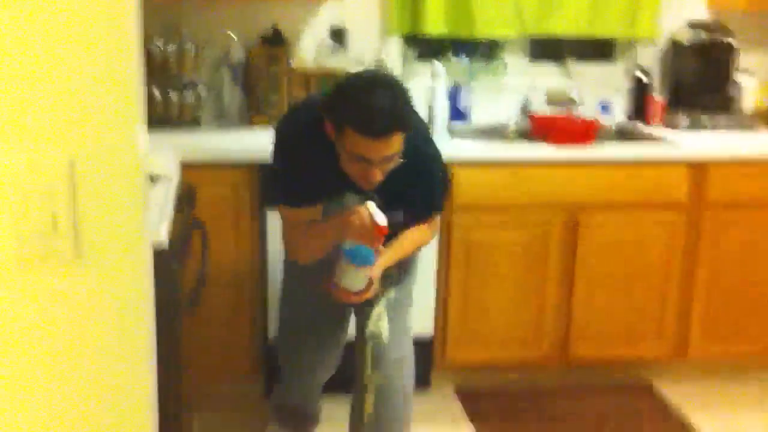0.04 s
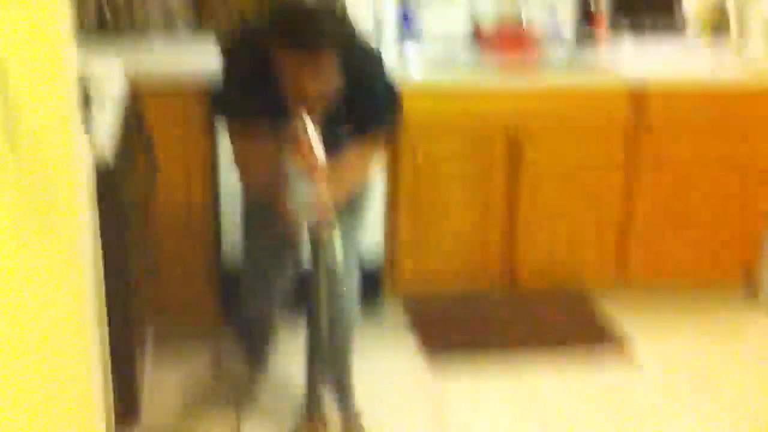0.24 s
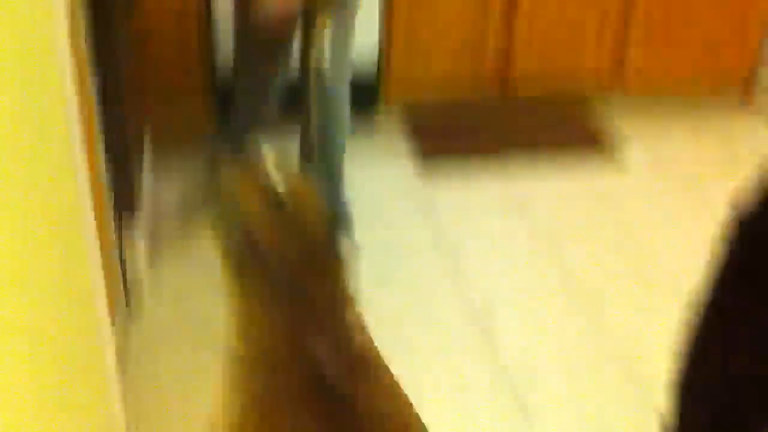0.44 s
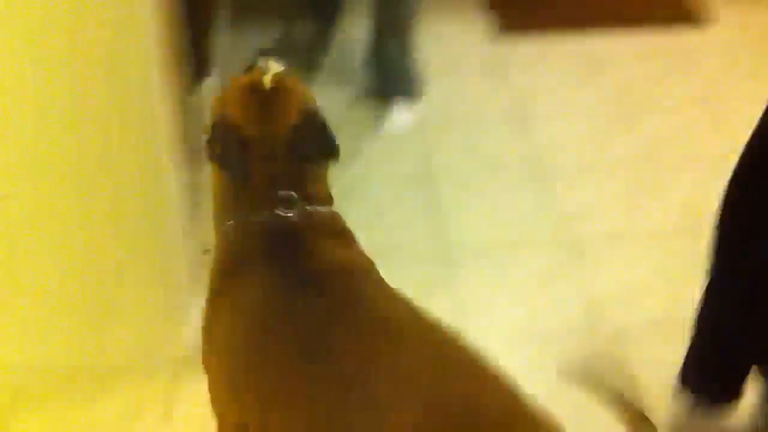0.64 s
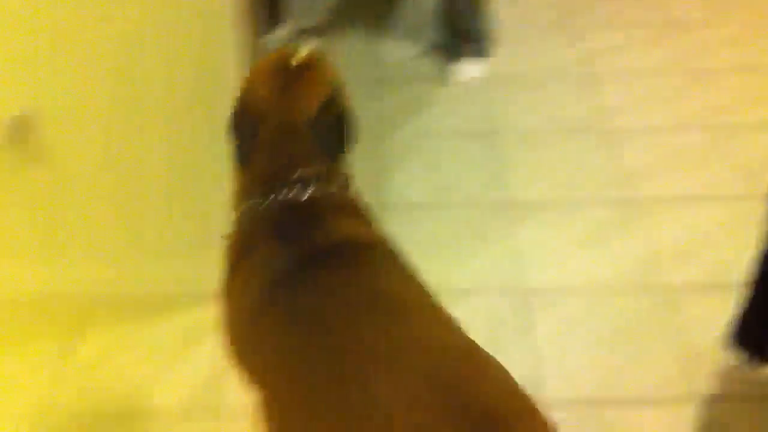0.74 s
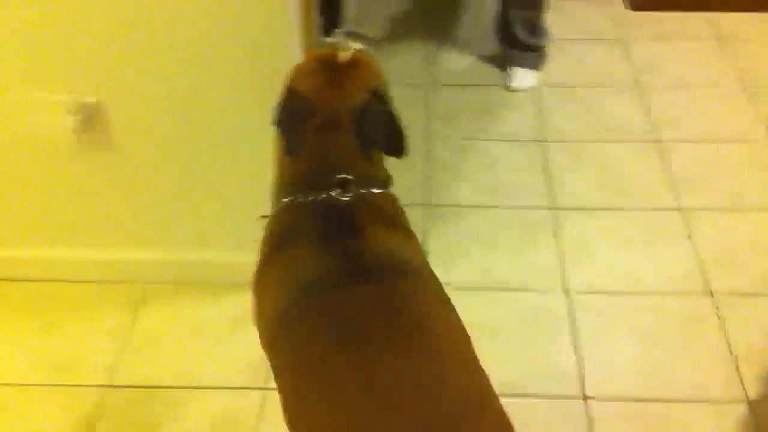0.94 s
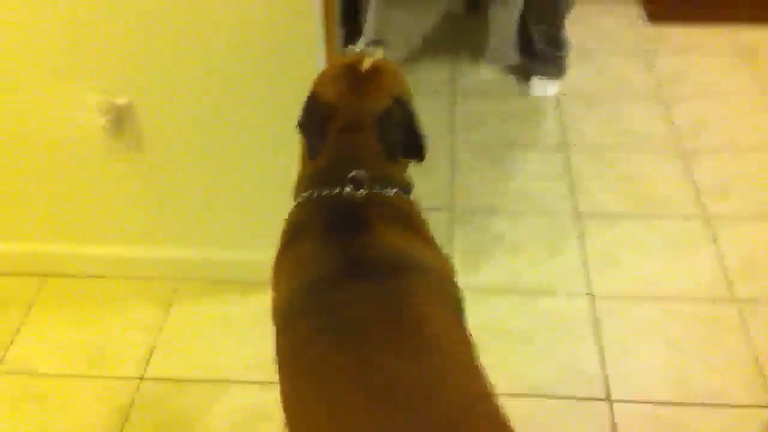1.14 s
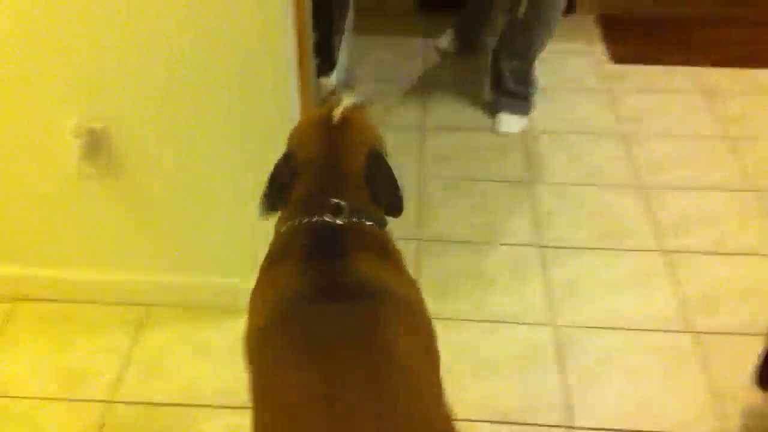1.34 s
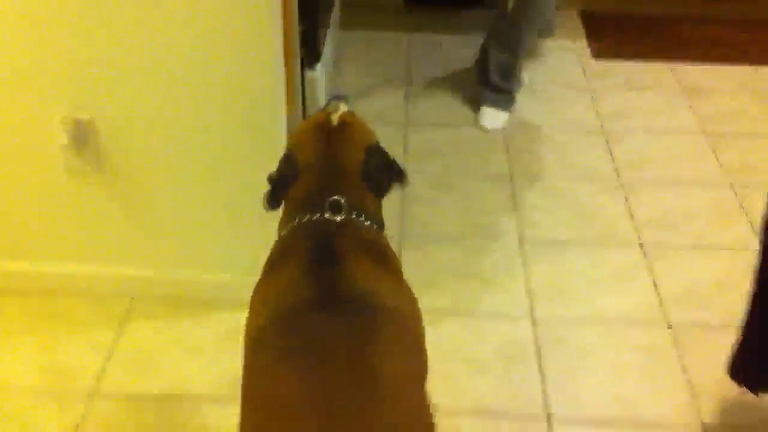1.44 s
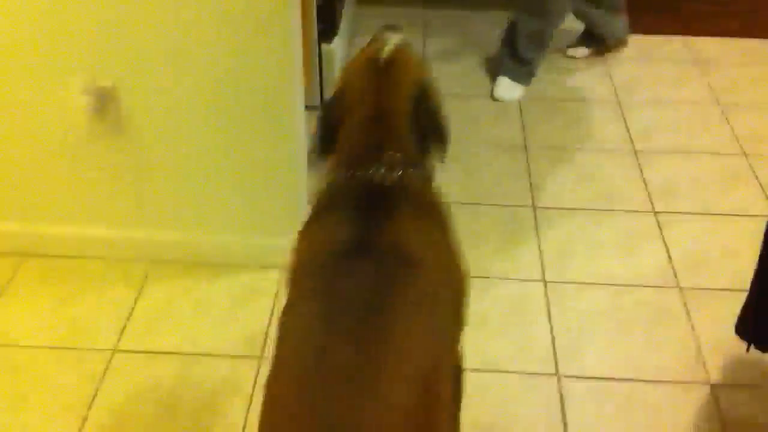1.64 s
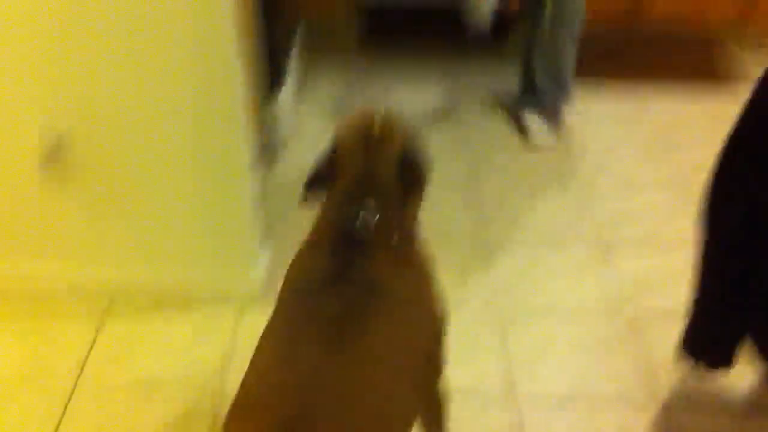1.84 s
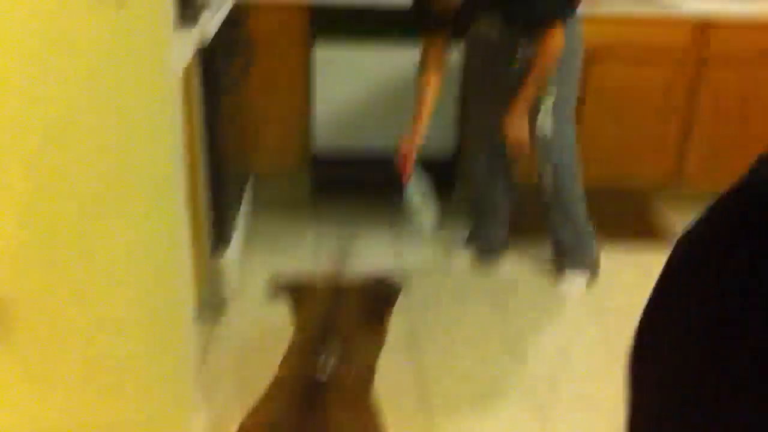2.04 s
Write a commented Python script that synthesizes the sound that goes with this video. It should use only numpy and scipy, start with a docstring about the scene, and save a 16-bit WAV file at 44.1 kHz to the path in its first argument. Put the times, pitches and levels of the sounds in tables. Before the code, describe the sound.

Big dog barking indoors: one bark, a pause with a rumble, then two quick barks.

```python
"""Large dog barking in a tiled kitchen

A large dog, facing away, barks three times: vocal pulses and noise puffs through moving resonances.
It rumbles hoarsely before the first bark and again before the second: throbbing noise plus a tone.
Paws tick and slide (coloured noise), the body's weight thuds, a tag clinks once (decaying sine).
Room air and a faint hum lie below; the hard room rings on and a limiter holds down the loudest peaks.
"""
import sys
import numpy as np
from scipy import signal
from scipy.fft import rfft, irfft
from scipy.io import wavfile
from scipy.ndimage import uniform_filter1d, minimum_filter1d

SR = 44100
rng = np.random.default_rng(int(sys.argv[2]) if len(sys.argv) > 2 else 0)


def master_out(mix):
    """Clip the mix to full scale and print it as 16-bit PCM to the path in sys.argv[1]."""
    frames = np.transpose(np.atleast_2d(mix))
    ceiling = np.clip(frames, -1, 1)
    pcm = np.round(ceiling * 32767).astype(np.int16)
    wavfile.write(sys.argv[1], SR, pcm)


def undo_db(level):
    """Turn decibels back into plain size, where 20 dB means ten times bigger."""
    steps = np.asarray(level, float) / 20
    return 10 ** steps


N = 92610


def evened(x):
    """Scales to rms 1."""
    return x / np.sqrt(np.mean(x ** 2) + 1e-20)


def read(points, hz):
    """Interpolates a spectrum table on a log-frequency axis."""
    f, value = np.transpose(points)
    return np.interp(np.log(hz + 1), np.log(f + 1), value)


def coloured(points, size):
    """Noise with the given spectrum, rms 1."""
    spectrum = rfft(rng.standard_normal(size))
    gain = undo_db(read(points, np.fft.rfftfreq(size, 1 / SR)))
    return evened(irfft(spectrum * gain, size))


def wobble(size, smooth_s):
    """Twice-smoothed noise as a slow random curve, rms 1."""
    width = max(round(smooth_s * SR), 2)
    once = uniform_filter1d(rng.standard_normal(size), width)
    return evened(uniform_filter1d(once, width))


def phase_turns(hz):
    """Integrates frequency into turns."""
    return np.cumsum(hz) / SR


def controls(rows):
    """Time axis, soft edges and the table columns, sample by sample."""
    rows = np.array(rows, float)
    t = np.arange(rows[0, 0], rows[-1, 0], 1 / SR)
    to_edge_s = np.minimum(t - t[0] + 1e-4, (t[-1] - t) / 10)
    edge = np.clip(to_edge_s / 0.0009, 0, 1)
    return t, edge, [np.interp(t, rows[:, 0], col) for col in rows[:, 1:].T]


def add(mix, start_s, sound):
    """Mixes a sound in at a time."""
    part = mix[max(round(start_s * SR), 0):][:len(sound)]
    part += sound[:len(part)]


def resonate(x, hz, width_hz):
    """One resonance of gain 1 following the curve hz: shift to 0 Hz, low-pass, shift back."""
    carrier = np.exp(2j * np.pi * phase_turns(hz * np.ones(len(x))))
    r = np.exp(-np.pi * width_hz / SR)
    return 2 * (carrier * signal.lfilter([1 - r], [1, -r], x / carrier + 1e-18)).real


def resonate_twice(x, hz, width_hz):
    """Two equal resonances in series: steeper skirts."""
    return resonate(resonate(x, hz, width_hz), hz, width_hz)


# room air spectrum: (freq_hz, level_db_per_hz)
AIR_SPECTRUM = [(35, -93), (60, -71), (159, -2.5), (231, -21), (453, -7.5), (1350, -28), (1590, -12),
                (2410, -21.5), (15500, -50.5)]
AIR_DB = -55
HUM_HZ, HUM_DB, HUM_WAVER_DB = 216, -60, 0.46


def background():
    """Coloured noise for room air, plus a sine hum of wavering level."""
    hum_level = undo_db(HUM_DB + HUM_WAVER_DB * wobble(N, 0.02))
    hum = hum_level * np.sin(2 * np.pi * HUM_HZ * np.arange(N) / SR)
    return undo_db(AIR_DB) * coloured(AIR_SPECTRUM, N) + hum


# reverberation time: (freq_hz, t60_s)
ROOM_DECAY = [(200, 0.79), (500, 0.68), (1000, 0.6), (2000, 0.58), (4000, 0.64), (8000, 0.56),
              (16000, 0.57)]
# standing waves between hard walls: (freq_hz)
STANDING_HZ = [345, 385, 435, 465, 508, 575, 653, 738, 832, 878, 932, 1064, 1174, 1240, 1486]
# their relative levels, same order: (level_db)
STANDING_MODE_DB = [-2.5, 2.5, 3.5, 1.5, -12.5, -2.5, 2, 0, -9, -6, 3.5, 5, -46, 6, -18.5]
STANDING_T60_S, STANDING_DB = .33, -21
DIRECT_DB, TAIL_DB = -4, -4


def kitchen(x):
    """Direct sound, a tail of random taps decaying per frequency, and decaying standing waves."""
    # one tap of random sign at a random place in every 20 samples
    at = np.arange(200, SR - 20, 20) + rng.integers(0, 20, (SR - 201) // 20)
    taps = np.zeros(SR)
    taps[at] = rng.choice([-1., 1.], len(at))
    hz, frame_s, z = signal.stft(taps, SR, nperseg=256)
    decay = undo_db(-60 * frame_s / read(ROOM_DECAY, hz)[:, None])
    tail = signal.istft(z * decay, SR, nperseg=256)[1][:SR]
    t = np.arange(SR) / SR
    rings = np.zeros(SR)
    for mode_hz, mode_db in zip(STANDING_HZ, STANDING_MODE_DB):
        level = undo_db(mode_db - 60 * t / STANDING_T60_S)
        rings += level * np.sin(2 * np.pi * (mode_hz * t + rng.random()))
    room = undo_db(TAIL_DB) * tail / np.linalg.norm(tail)
    room += undo_db(STANDING_DB) * rings / np.linalg.norm(rings)
    return undo_db(DIRECT_DB) * x + signal.fftconvolve(x, room)[:N]


def puff(length_s, level_db, spectrum):
    """Coloured noise that swells and fades over half a sine."""
    t = np.arange(0, length_s, 1 / SR)
    noise = coloured(spectrum, SR // 2)[:len(t)]
    return undo_db(level_db) * np.sin(np.pi * t / length_s) * noise


# body's weight landing on the floor: (start_s, length_s, level_db)
THUDS = [(.19, 0.03, -32.5), (1.33, 0.073, -38.5), (1.87, 0.11, -43.5)]
# thud spectrum: (freq_hz, level_db_per_hz)
THUD_SPECTRUM = [(50, -34.5), (130, -13), (220, -10), (320, -7.5), (500, -43.5)]


def thuds(mix):
    """The body's weight lands on the floor: low noise puffs."""
    for start_s, length_s, level_db in THUDS:
        add(mix, start_s, puff(length_s, level_db, THUD_SPECTRUM))


# paws sliding on tile: (start_s, length_s, level_db)
SCUFFS = [(0.037, 0.031, -44), (0.387, 0.12, -47.5), (0.736, 0.03, -37.5), (0.82, 0.023, -35),
          (1.856, 0.06, -45.5)]
# paw on tile spectrum, slides and ticks: (freq_hz, level_db_per_hz)
PAW_SPECTRUM = [(400, -40), (1500, 8), (3000, -2), (5500, 2.5), (8000, -2), (12000, -5.5), (16000, -10.5)]


def scuffs(mix):
    """Paws slide on tile: bright noise puffs."""
    for start_s, length_s, level_db in SCUFFS:
        add(mix, start_s, puff(length_s, level_db, PAW_SPECTRUM))


# claw ticks: (start_s, level_db, t60_s)
CLAWS = [(0.19, -30.5, 0.055)]


def claws(mix):
    """A claw ticks on tile: bright noise with exponential decay."""
    t = np.arange(4000) / SR
    for start_s, level_db, t60_s in CLAWS:
        decay = undo_db(level_db - 60 * t / max(t60_s, .003))
        add(mix, start_s, decay * coloured(PAW_SPECTRUM, len(t)))


TAG_START_S, TAG_HZ, TAG_DB, TAG_T60_S, TAG_WAVER_DB = .94, 2072, -36, .45, 3


def tag(mix):
    """One small metal disc: a decaying sine, level and pitch wavering as it swings."""
    t = np.arange(SR // 2) / SR
    attack = np.minimum(t / 0.0033, 1)
    swing = undo_db(TAG_WAVER_DB * wobble(len(t), .008))
    turns = phase_turns(TAG_HZ * (1 + .006 * wobble(len(t), .006)))
    decay = undo_db(TAG_DB - 60 * t / TAG_T60_S)
    add(mix, TAG_START_S, attack * swing * decay * np.sin(2 * np.pi * turns))


# hoarse rumbles, one list each: (time_s, level_db, pitch_hz, rasp_above_level_db)
RUMBLES = [
    [(0.0, -47, 534.7, 0.5), (0.032, -41.5, 581, 0), (0.074, -47.5, 570.5, -1), (0.126, -46.5, 519.5, -7),
     (0.166, -64, 600, 9), (0.18, -52, 575, -31)],
    [(.61, -56, 672, -6), (.64, -39, 664, -16), (.69, -38, 620, -6), (.775, -38, 616, -3),
     (.86, -39.5, 597, -1), (.9, -39, 562, -5), (.955, -41, 552, -2), (.985, -51, 546, 8),
     (1.1, -57, 540, 7), (1.21, -65, 548, 6)],
]
# fixed body resonances: (freq_hz, width_hz, level_db)
RUMBLE_BODY = [(268, 125, -4), (1084, 120, -5.5), (2080, 600, -11)]
# rasp spectrum: (freq_hz, level_db_per_hz)
RASP_SPECTRUM = [(300, -7.5), (800, -4), (2000, -4), (3000, -12), (4000, -8.5), (5500, -15.5),
                 (8000, -17.5), (12000, -22), (16000, -32)]
FLUTTER_PER_S, FLUTTER_DEPTH = 24, .75
RUMBLE_WIDTH_HZ, TONE_DB = 50, 4
OCTAVE_DB, OCTAVE_RISE_DB_PER_S, OCTAVE_WIDTH_HZ = -7, 26, 140


def rumble(rows):
    """Air flutters through a slack throat: throbbing noise in resonances, a clear tone, and rasp."""
    t, edge, (level_db, hz, rasp_db) = controls(rows)
    flutter_turns = phase_turns(FLUTTER_PER_S * (1 + .03 * wobble(len(t), .03)))
    throb = 1 + FLUTTER_DEPTH * np.cos(2 * np.pi * flutter_turns)
    air = throb * rng.standard_normal(len(t))

    def band(band_hz, width_hz):
        """Throbbing air through a narrow and a wide resonance, rms 1."""
        return evened(resonate(resonate(air, band_hz, width_hz), band_hz, 3 * width_hz))

    tone_turns = phase_turns(hz * (1 + .01 * wobble(len(t), .008)))
    tone = undo_db(TONE_DB) * throb * np.sin(2 * np.pi * tone_turns)
    # fuzzy band an octave above the tone
    octave_level = undo_db(OCTAVE_DB + OCTAVE_RISE_DB_PER_S * (t - t[0]))
    octave = octave_level * band(2 * hz, OCTAVE_WIDTH_HZ)
    body = sum(undo_db(db) * band(f, width) for f, width, db in RUMBLE_BODY)
    voice = tone + band(hz, RUMBLE_WIDTH_HZ) + octave + body
    rasp = undo_db(rasp_db) * np.sqrt(throb) * coloured(RASP_SPECTRUM, len(t))
    return t[0], edge * undo_db(level_db) * (voice + rasp)


# barks, one list each: (time_s, effort_db, hiss_above_voice_db, upper_resonances_above_voice_db)
BARKS = [
    [(0.19, -48, -4, -4), (0.194, -32, -6, -6), (0.246, -7.5, -38, -10.5), (0.268, -9.5, -30.5, -6.5),
     (0.344, -22, -17.5, -3.5), (0.37, -24.5, -20, 7), (0.42, -40, -35, -20)],
    [(1.31, -58, -3, -23), (1.324, -48, -13, -16), (1.362, -22.5, -40, -11), (1.388, -5.5, -35, -5.5),
     (1.442, -17, -23, -3), (1.458, -12.5, -27.5, -9.5), (1.5, -18, -41, -9)],
    [(1.632, -17, -38, -2.5), (1.656, -8.5, -33.5, -10), (1.672, -11.5, -25.5, -6.5),
     (1.686, -8, -30, -15.5), (1.708, -24, -22, -6), (1.73, -22, -21.5, -6), (1.8, -17, -51, -13.5)],
]
# one row per bark: (open_mouth_pitch_hz, noise_share_0_1, mouth_opening_s, closing_per_s,
# second_resonance_db, pitch_climb_per_s, third_resonance_climb_per_s, bite_db, first_resonance_factor)
VOICES = [(441.6, 0.72, .06, .1, -3.5, 1, 0.93, -36.5, 1.02),
          (285.7, 0.64, 0.065, 0.41, 2, 2.5, 0.33, -31.5, 1.107),
          (285, 0.78, .025, 0.702, 0.5, 1.2, 0.36, -34, 1.02)]
# throat resonances, mouth open: (freq_hz, width_hz, level_db)
THROAT = [(515, 247, 4.5), (853, 308, -0.5), (1247, 510, 4), (2230, 590, -14.5)]
# breath hiss spectrum: (freq_hz, level_db_per_hz)
BREATH_SPECTRUM = [(1500, -15), (2600, -3.5), (3500, 2.5), (4900, -2.5), (5900, 6.5), (7000, -0.5),
                   (8500, -7.5), (12000, -14.5), (16000, -25)]
SHUT_SHARE = .8  # pitch and resonances start at this share
PITCH_JITTER_SHARE, ALTERNATION_DEPTH = .06, .52  # alternation: strong-weak pulses
GROWL_PER_S, GROWL_DEPTH = 75, .5  # coarse beating of the pulses
VOICE_CUT_HZ = 405
BITE_HZ, BITE_WIDTH_HZ, BITE_FADE_DB_PER_S = 2850, 600, 70
CHEST_HZ, CHEST_WIDTH_HZ, CHEST_DB, CHEST_RISE_DB_PER_S = 340, 90, -29, 110


def bark(rows, open_hz, noise_share, open_s, closing, second_db, climb, third_climb, bite_db, first):
    """Uneven vocal pulses and puffs of noise pass the throat; breath hisses above."""
    t, edge, (effort_db, hiss_db, bright_db) = controls(rows)
    age = t - t[0]
    opened = np.maximum(age - open_s, 0)  # s since the mouth was open
    mouth = np.minimum(SHUT_SHARE + (1 - SHUT_SHARE) * age / open_s, 1) - closing * opened

    pitch = open_hz * (mouth + climb * opened)
    turns = phase_turns(pitch * (1 + PITCH_JITTER_SHARE * wobble(len(t), 0.0046)))
    folds = sum(np.cos(2 * np.pi * k * turns) for k in range(1, round(3300 / open_hz)))
    folds = folds * (1 + ALTERNATION_DEPTH * np.cos(np.pi * turns))
    gate = 0.94 + np.exp(-(turns % 1) / 0.059)  # one puff per pulse
    puffs = gate * rng.standard_normal(len(t))
    drive = (1 - noise_share) * evened(folds) + noise_share * evened(puffs)

    # low ring that grows through the bark
    chest_level = undo_db(CHEST_DB + CHEST_RISE_DB_PER_S * age)
    chest = chest_level * evened(resonate_twice(drive, CHEST_HZ, CHEST_WIDTH_HZ))

    growl_turns = phase_turns(GROWL_PER_S * (1 + 0.275 * wobble(len(t), 0.0097)))
    beat = 1 + GROWL_DEPTH * np.cos(2 * np.pi * growl_turns)
    low_cut = signal.butter(6, VOICE_CUT_HZ, "high", fs=SR, output="sos")
    drive = signal.sosfilt(low_cut, beat * drive)

    shifts = [first * mouth, mouth, mouth + third_climb * opened, mouth]
    bands = []
    for k, ((hz, width_hz, db), shift) in enumerate(zip(THROAT, shifts)):
        # alternating signs
        bands.append((-1) ** k * undo_db(db) * resonate_twice(drive, hz * shift, width_hz))
    low = evened(bands[0] + undo_db(second_db) * bands[1])
    bright = undo_db(bright_db) * evened(bands[2] + bands[3])

    # bright edge, fading once the mouth is open
    bite_level = undo_db(bite_db - BITE_FADE_DB_PER_S * opened)
    bite = bite_level * evened(resonate_twice(drive, BITE_HZ, BITE_WIDTH_HZ))
    hiss = undo_db(hiss_db) * evened(gate * coloured(BREATH_SPECTRUM, len(t)))
    return t[0], edge * undo_db(effort_db) * (low + chest + bite + bright + hiss)


def scene():
    """All sounds of the dog in the kitchen, over the background."""
    dog = np.zeros(N)
    thuds(dog)
    scuffs(dog)
    claws(dog)
    tag(dog)
    for rows in RUMBLES:
        add(dog, *rumble(rows))
    for rows, voice in zip(BARKS, VOICES):
        add(dog, *bark(rows, *voice))
    return (kitchen(dog) + background())[None]


def band_limit(x):
    """A steep low-pass at the top of the band."""
    return signal.sosfilt(signal.butter(12, 16620, fs=SR, output="sos"), x)


LOW_CUT_HZ, TOP_CUT_HZ = 103, 15900
CEILING, LIMIT_S = .715, .0007  # ceiling: share of full scale


def record(dry):
    """The microphone drops the bass, a fast limiter holds the peaks down, the top band is cut."""
    low_cut = signal.butter(4, LOW_CUT_HZ, "high", fs=SR, output="sos")
    thin = signal.sosfilt(low_cut, dry)
    width = round(LIMIT_S * SR)
    allowed = np.minimum(CEILING / (np.abs(thin) + 1e-9), 1)
    held = minimum_filter1d(allowed, size=2 * width)
    gain = uniform_filter1d(uniform_filter1d(held, size=width), size=width)
    top_cut = signal.firwin(255, TOP_CUT_HZ, fs=SR)[None]
    mix = signal.oaconvolve(thin * gain, top_cut, "same")
    return band_limit(mix)


dry = scene()
out = record(dry)
master_out(out)
```